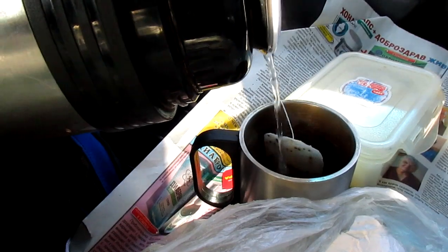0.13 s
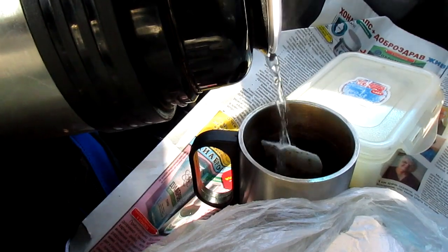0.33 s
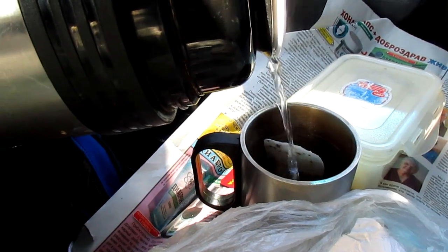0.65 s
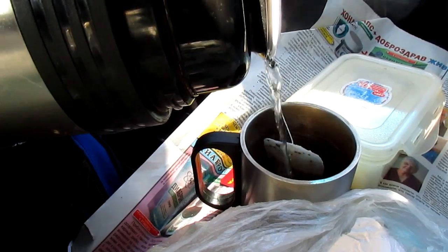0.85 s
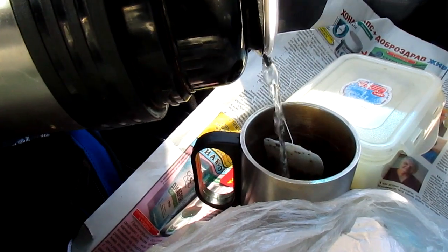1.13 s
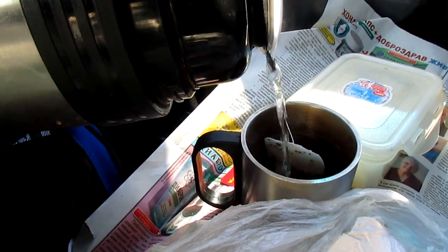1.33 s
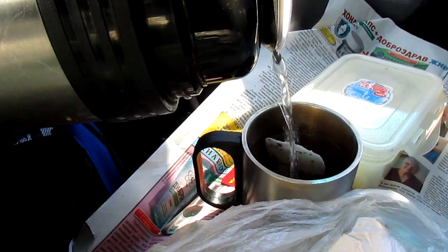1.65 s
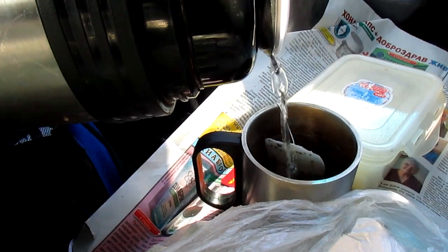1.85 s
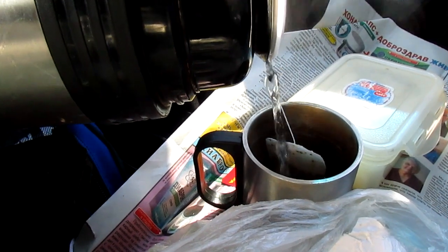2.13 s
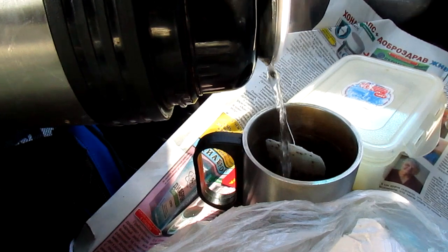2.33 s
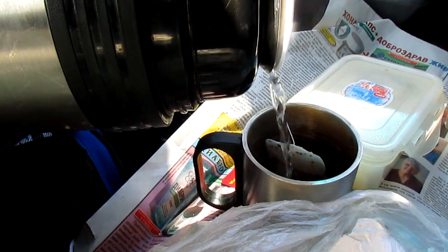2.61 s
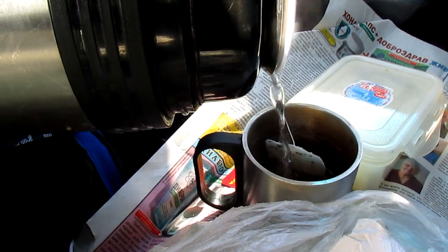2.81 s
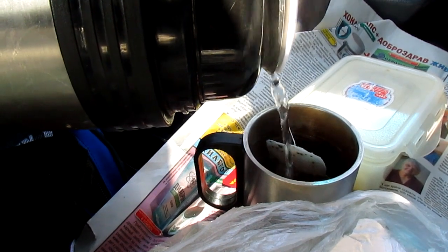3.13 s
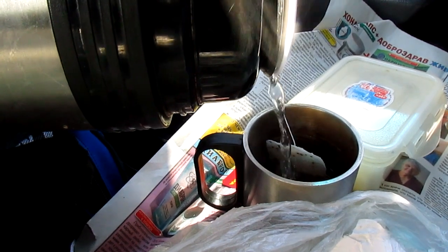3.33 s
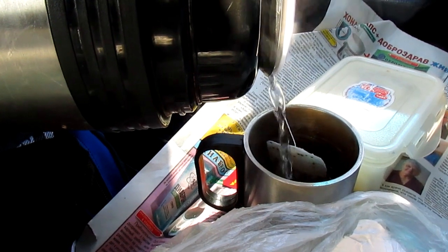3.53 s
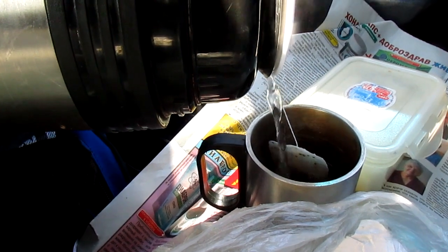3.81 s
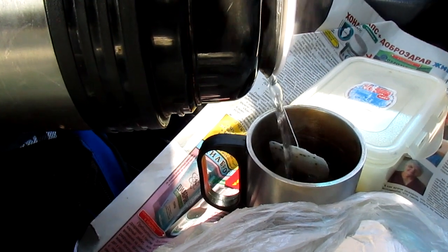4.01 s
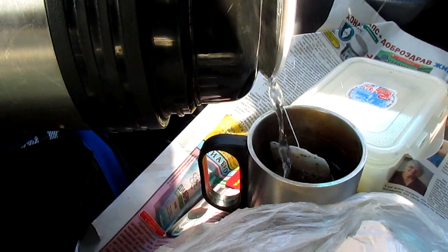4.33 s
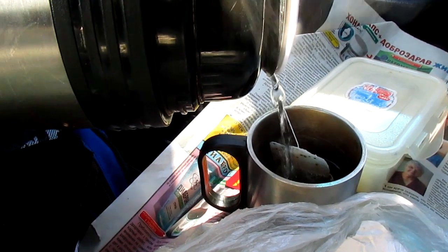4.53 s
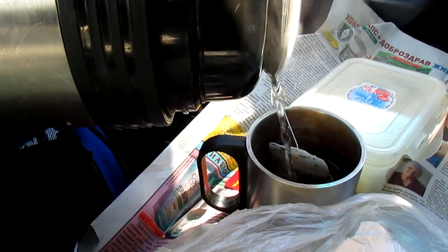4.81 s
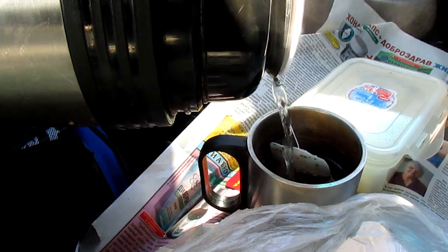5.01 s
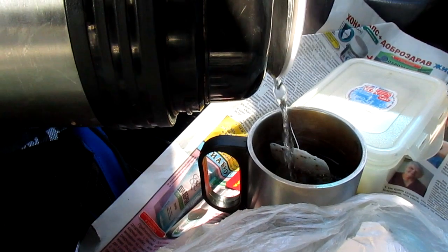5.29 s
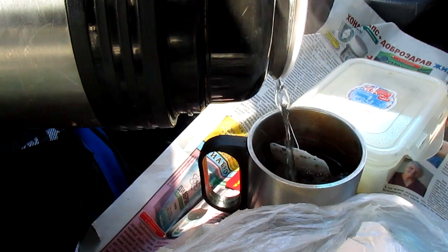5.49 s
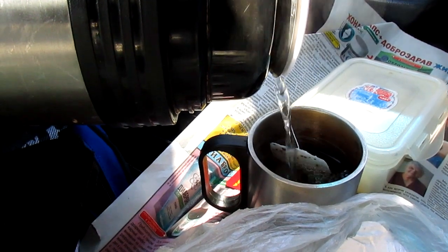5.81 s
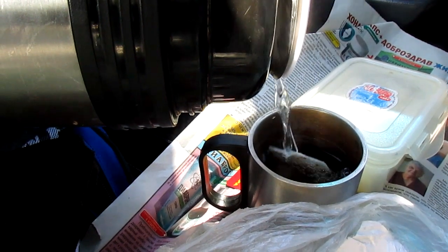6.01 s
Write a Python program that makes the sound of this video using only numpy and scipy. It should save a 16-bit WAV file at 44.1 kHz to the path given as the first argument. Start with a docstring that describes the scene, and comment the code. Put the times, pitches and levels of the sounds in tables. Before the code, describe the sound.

A thin stream of hot water trickles from a flask into a steel mug, first crisp and spattering, then increasingly bubbly and gurgling.

```python
"""Pouring water into a steel mug

A thin, beaded stream falls from a flask into a steel mug holding a tea bag, inside a parked car.
Beads make noise-burst splashes and decaying, rising bubble tones; drifting mug resonances shape both.
Spatter, fizz and burble are crowds of such grains and shaped noise; single bubbles ping as short notes.
The flask bumps softly in the hand (damped low tone plus noise); the padded cabin adds a brief echo."""
import sys
import numpy as np
from scipy import signal
from scipy.fft import rfft, irfft, next_fast_len
from scipy.io import wavfile
from scipy.ndimage import uniform_filter1d

SR = 44100
rng = np.random.default_rng(int(sys.argv[2]) if len(sys.argv) > 2 else 0)


def transcribe(u):
    """Save the signal u as a 16-bit wav file named by the first command-line argument.

    u: samples, shape (n,) or (channels, n), limited to [-1, 1]; the rate is SR.
    q: integer samples, one column per channel.
    """
    v = np.clip(np.atleast_2d(u).T, -1, 1)
    q = np.round(v * 32767).astype(np.int16)
    wavfile.write(sys.argv[1], SR, q)


N = 271215
GRAIN_SAMPLES = 2048
TOP_HZ = 16100  # band limit

# heaviest beads landing:
# (time [s], bubble level [dB], bubble pitch [Hz], splash level [dB], splash pitch [Hz]), levels before trim
HEAVY_BEADS = [(0.022, -55, 1150, -37.5, 6800), (0.0314, -58, 1110, -37.5, 8200),
               (0.094, -54, 1300, -39, 4800), (0.1476, -40, 1120, -45.5, 4740),
               (0.1762, -36.5, 1090, -44, 5860), (0.2718, -52, 1050, -43, 6370),
               (0.3236, -44.5, 1170, -43, 3820), (0.501, -49, 1165, -31.5, 6580),
               (0.605, -46, 1040, -55, 6300), (0.68, -64, 1220, -39, 5930),
               (0.7214, -51, 1185, -40.5, 6500), (0.897, -57, 1210, -38, 6550),
               (1.064, -46.5, 1120, -44, 6420), (1.288, -49, 1390, -39.5, 8200),
               (1.303, -40.5, 1860, -34, 4340), (1.527, -62, 1600, -31, 9200),
               (1.5555, -34, 1440, -38, 6600), (1.585, -51.5, 1420, -32.5, 8400),
               (1.614, -56, 1370, -35, 6600), (1.649, -32.5, 1490, -34.5, 7100),
               (1.812, -34.5, 1420, -38.5, 5250), (1.834, -36.5, 1400, -36, 4470),
               (1.853, -40.5, 1370, -41, 3980), (1.867, -29.5, 1240, -26, 5470),
               (1.9034, -34, 1420, -33.5, 8650), (1.936, -47, 1430, -32.5, 8850),
               (1.979, -41, 1240, -36.5, 5540), (2.0135, -43, 1440, -38.5, 9000),
               (2.069, -45.5, 1330, -39.5, 4850), (2.0984, -47, 1370, -33.5, 7900),
               (2.1407, -43, 810, -65, 5960), (2.191, -43, 1240, -45.5, 5070),
               (2.333, -44, 1280, -63, 7450), (2.384, -40.5, 1350, -42, 6300),
               (2.3981, -44, 1220, -38, 5400), (2.4126, -39, 1200, -34, 6900),
               (2.4634, -79, 1080, -31.5, 12700), (2.5066, -37, 1430, -37, 7400),
               (2.5474, -46, 1310, -36.5, 10900), (2.612, -45, 1380, -38.5, 6000),
               (2.6769, -35.5, 1070, -32, 7900), (2.704, -28, 820, -34.5, 7840),
               (2.7393, -33.5, 950, -43.5, 4960), (2.762, -38, 1290, -36, 7400),
               (2.7768, -33, 1190, -36.5, 7150), (2.881, -35.5, 1254, -45, 6680),
               (2.931, -41.5, 1400, -31, 3770), (2.979, -39, 1320, -63, 5500),
               (3.0177, -32.5, 1340, -46, 5630), (3.059, -34, 1310, -35.5, 5700),
               (3.181, -37, 1310, -35, 5700), (3.228, -32.5, 1440, -50, 3880),
               (3.2683, -28.5, 1380, -50, 3420), (3.3005, -36.5, 1230, -33.5, 6540),
               (3.318, -38, 1460, -33, 6380), (3.3373, -32.5, 1390, -38.5, 5100),
               (3.3608, -27.5, 1410, -39, 7280), (3.405, -36.5, 1400, -25, 9070),
               (3.4227, -33.5, 1470, -44, 9450), (3.4658, -37, 1390, -34, 8100),
               (3.49, -35, 1325, -39.5, 6050), (3.5423, -33.5, 1415, -46, 6640),
               (3.579, -38, 1660, -38, 3840), (3.608, -37, 1260, -39, 5650), (3.629, -33, 1320, -38, 6200),
               (3.642, -31, 1720, -37.5, 9900), (3.665, -36, 1395, -34.5, 4600),
               (3.6914, -29, 1260, -58, 5300), (3.8326, -27.5, 785, -42, 3660),
               (3.852, -32, 1280, -37, 6000), (3.8674, -31, 970, -41.5, 5750),
               (3.894, -39, 1200, -53, 5070), (3.961, -40, 1520, -35, 7100), (3.9667, -23, 1580, -34, 5880),
               (3.995, -46, 1670, -41.5, 5240), (4.007, -34.5, 1620, -49, 5320),
               (4.0363, -39, 1380, -47, 5540), (4.048, -30, 1396, -39.5, 5270),
               (4.0978, -34, 1060, -45, 5500), (4.103, -35.5, 1000, -40.5, 6300),
               (4.13, -34, 1200, -41, 6540), (4.1716, -29, 1110, -35.5, 6340),
               (4.183, -38, 1070, -39, 4400), (4.233, -38.5, 1280, -49, 4810),
               (4.248, -30.5, 1420, -48, 5040), (4.26, -35, 1466, -67, 4980),
               (4.2828, -28.5, 1148, -44, 4520), (4.31, -29, 1420, -33.5, 8000),
               (4.341, -28.5, 1630, -37, 4950), (4.379, -31, 1700, -39, 5370),
               (4.4226, -32, 1477, -37.5, 6660), (4.452, -34.5, 1210, -61, 5500),
               (4.4826, -34.5, 1459, -35.5, 3170), (4.504, -30.5, 1230, -50, 4170),
               (4.5224, -36, 1340, -39.5, 5620), (4.5738, -35.5, 737, -69, 5570),
               (4.592, -37, 956, -67, 6860), (4.624, -30, 800, -42.5, 7990),
               (4.6547, -31.5, 1080, -45, 4500), (4.6628, -34.5, 1400, -41, 5040),
               (4.688, -35, 1300, -54, 5070), (4.71, -34, 1470, -41.5, 4250),
               (4.8247, -32, 1300, -44.5, 7100), (4.859, -45, 1050, -37, 6520),
               (4.8758, -26, 820, -48, 5780), (4.8924, -27, 1780, -65, 4020), (4.903, -37, 1290, -31, 6500),
               (4.909, -36, 1060, -35, 6140), (4.9293, -30.5, 1200, -44, 5240),
               (4.985, -33.5, 1800, -32, 6400), (5.007, -35, 1060, -50, 6680),
               (5.0269, -33, 1550, -45, 5530), (5.076, -39, 780, -50, 4480), (5.085, -32.5, 750, -56, 5110),
               (5.112, -51, 1200, -40.5, 4850), (5.131, -39, 1170, -46, 5540),
               (5.16, -37.5, 1090, -43, 6000), (5.208, -29, 679, -47, 4660),
               (5.233, -41.5, 1020, -39, 5540), (5.255, -38, 1510, -38, 3900),
               (5.275, -31.5, 1370, -43.5, 4880), (5.3073, -34, 1830, -48, 5760),
               (5.3683, -29.5, 1360, -41, 5530), (5.3915, -33, 1020, -53, 4430),
               (5.4159, -29, 700, -42, 7820), (5.429, -39, 820, -54, 4670), (5.4421, -35, 1270, -40, 5200),
               (5.462, -36.5, 960, -42, 5830), (5.5001, -32, 1514, -58, 6800),
               (5.539, -31, 1330, -42, 3670), (5.5748, -32, 1678, -35.5, 7650),
               (5.619, -37.5, 1660, -44.5, 4730), (5.718, -37.5, 1370, -39, 5220),
               (5.729, -33.5, 800, -56, 5480), (5.755, -35.5, 886, -44, 5700), (5.765, -36, 917, -47, 5200),
               (5.781, -31, 1810, -62, 4350), (5.815, -32, 1460, -40, 7300),
               (5.848, -36.5, 1040, -38, 4750), (5.924, -37, 1500, -42, 4650),
               (5.9827, -30.5, 1440, -37.5, 7000), (5.999, -34, 1195, -52, 5680),
               (6.02, -34.5, 1380, -37.5, 7810), (6.0597, -28.5, 1240, -40.5, 6850)]
# strength of the stream as the hand tips the flask: (time [s], level [dB])
FLOW = [(0.0, -46.5), (0.2, -48.5), (0.42, -55), (0.72, -47.5), (0.92, -49), (1.1, -52.5), (1.33, -45),
        (1.42, -52.5), (1.57, -35), (1.74, -45.5), (1.92, -47), (2.15, -43.5), (2.28, -52), (2.42, -47),
        (2.76, -46), (2.84, -49.5), (2.98, -41), (3.23, -49), (3.32, -48), (3.86, -43.5), (3.92, -48.5),
        (3.98, -47.5), (4.4, -44.5), (5.13, -45.5), (5.19, -55), (5.24, -44.5), (5.6, -44.5), (6.03, -47.5),
        (6.15, -48)]
# moments of shallow, part-filled and final depth: (time [s])
FILL_TIMES_S = [1, 2.5, 4.66]
# central splash and bubble pitch at those three depths: (pitch [Hz])
SPLASH_PITCH_HZ = [7110, 8160, 7020]
BUBBLE_PITCH_HZ = [1273, 1454, 1287]


def amp(db):
    """Decibels to gain."""
    return 10 ** (np.asarray(db) / 20)


def unit(x):
    """Scale to rms 1."""
    return x / np.sqrt(np.mean(x ** 2) + 1e-20)


def along(points, hz):
    """Interpolate (Hz, value) points on a log-frequency axis."""
    f, v = np.transpose(points)
    return np.interp(np.log(hz + 1), np.log(f + 1), v)


def filtered(x, response):
    """Apply a complex frequency response to x."""
    m = next_fast_len(N + SR // 2)
    spectrum = rfft(x, m) * response(np.fft.rfftfreq(m, 1 / SR))
    return irfft(spectrum, m)[..., :N]


def causal(gain):
    """Minimum-phase response with these gains: rings only after the strike."""
    cepstrum = irfft(np.log(np.maximum(gain, 1e-6)))
    cepstrum[..., 1:GRAIN_SAMPLES // 2] *= 2
    cepstrum[..., GRAIN_SAMPLES // 2 + 1:] = 0
    return np.exp(rfft(cepstrum))


def below(hz, edge_hz, order):
    """Low-pass gain."""
    return 1 / np.sqrt(1 + (hz / edge_hz) ** (2 * order))


def above(hz, edge_hz, order):
    """High-pass gain."""
    return below(edge_hz, hz + 1, order)


def place(times, grains):
    """Sum one grain per row at its time."""
    starts = np.round(np.maximum(times, 0) * SR).astype(int)
    index = starts[:, None] + np.arange(grains.shape[-1])
    return np.bincount(index.ravel(), grains.ravel(), N)[:N]


def sized(grains, db):
    """Give each grain the energy of 10 ms at its level."""
    power = np.sum(grains ** 2, -1, keepdims=True) / (SR / 100)
    return grains * amp(db) / np.sqrt(power + 1e-20)


def bounded_normals(count):
    """Four clipped normal draws per droplet."""
    return np.clip(rng.standard_normal((count, 4)), -1.6, 1.6)


def landings(count, uneven):
    """Loosely even times through the pour, each early or late by up to `uneven` gaps."""
    turns = np.arange(count) + .5 + uneven * rng.uniform(-1, 1, count)
    return turns % count * N / SR / count


def clear_of_beads(times, gap_s=.014):
    """Mask of the moments that lie away from every heavy bead."""
    bead_times = np.array(HEAVY_BEADS)[:, 0]
    return np.abs(times[:, None] - bead_times).min(axis=1) > gap_s


def flow_db(times):
    """Strength of the stream over time."""
    return np.interp(times, *np.transpose(FLOW))


def surge_db(times):
    """Flow relative to the mean of its table points."""
    return flow_db(times) - np.mean(FLOW, axis=0)[1]


def trapped_db(times):
    """Bubble level: a slow trend through the filling plus the surge of the flow."""
    # bubbles at average flow: (time [s], level before trim [dB])
    trapping = [(0.8, -50), (2.8, -52.5), (4.4, -42.5), (6.15, -48.5)]
    return np.interp(times, *np.transpose(trapping)) + surge_db(times)


def mug(times, hz, between_db=-17):
    """Gain of the mug's hollow as it fills; neighbouring resonances cancel between their peaks."""
    # drifting resonances: (centre at time 0 [Hz], drift [Hz/s], width [Hz],
    # shallow level [dB], part-filled level [dB], final level [dB])
    resonances = [(728, -8.5, 82, 2.5, -32, 7.5), (871, -27, 114, 0, 10, 6), (1173, 2, 82, 12, 0.5, -2),
                  (1362, 16.5, 149, 10, 14.5, 6.5), (1723, 1, 117, 10.5, 0.5, 10.5),
                  (2037, 9, 43, 6, -2, -1), (2773, -3.5, 64, 11.5, 12, 3.5),
                  (2982, 11.5, 65, 9.5, -1.5, 7.5), (3150, -5, 3040, 5.5, -2.5, -9.5),
                  (4490, 380, 260, 5.5, 5.5, -40), (6240, -40, 1500, 3.5, -4.5, -7.5),
                  (8700, 22, 1650, 0, 1.5, -5), (12000, 0, 4500, 2, -17, -8.5),
                  (12550, -8, 1900, -11, -1.5, -6)]
    times, total = times[:, None], 0
    for start_hz, drift_hz_per_s, width_hz, *depth_db in resonances:
        centre_hz = start_hz + drift_hz_per_s * times
        damping = 1j * hz * width_hz
        resonance = damping / (centre_hz ** 2 - hz ** 2 + damping)
        total = total + amp(np.interp(times, FILL_TIMES_S, depth_db)) * resonance
    return np.hypot(np.abs(total), amp(between_db))


def bubbles(times, db, pitch_hz, cycles=1.47, rise=0.33, push=0.46, life_octaves=0.93, swell_s=0.00036):
    """A trapped bubble rings for a few cycles, sharpening as it surfaces; the bead's push sounds the hollow."""
    t, hz = np.arange(GRAIN_SAMPLES) / SR, np.fft.rfftfreq(GRAIN_SAMPLES, 1 / SR)
    life_s = cycles * 2 ** (life_octaves * rng.uniform(-1.6, 1, (len(times), 1))) / pitch_hz
    age = t / life_s
    sharpening = 1 + rise * (np.minimum(age, 4) - 2) / 4
    envelope = np.exp(-age) * (1 - np.exp(-t / swell_s))
    ring = np.sin(2 * np.pi * pitch_hz * t * sharpening) * envelope
    source = rfft(ring) * 2 / (life_s * SR) - 1j * push * np.minimum(hz / pitch_hz, 1)
    body = mug(times, hz) * above(hz, 481, order=6) * below(hz, 1935, order=4)
    return place(times, sized(irfft(source * causal(body)), db))


def splashes(times, db, pitch_hz, ping=0.71, ping_cycles=8, spray_db=-9, octaves=0.73, skirt_db=-19,
             apart=0.8, lead_s=.001):
    """A snap, a short spray and a tiny bubble, scattered by the steel wall towards each side."""
    t = np.arange(GRAIN_SAMPLES) / SR - lead_s
    hz = np.fft.rfftfreq(GRAIN_SAMPLES, 1 / SR)
    age_s = np.maximum(t, 0)
    tear = np.exp(np.minimum(t, 0) / .0002)  # onset before the landing
    snap, spray = np.exp(-age_s / .0014), np.exp(-age_s / .006)
    shared, *own = rng.standard_normal((3, len(times), GRAIN_SAMPLES))
    burst = (shared + apart * np.array(own)) * tear * (snap + amp(spray_db) * spray)
    tiny = ping * np.sin(2 * np.pi * pitch_hz * age_s) * np.exp(-age_s * pitch_hz / ping_cycles)
    # passband around each splash's own pitch
    octaves_off = np.abs(np.log2((hz + 1) / pitch_hz))
    colour = below(octaves_off, octaves, order=3) + amp(skirt_db)
    body = mug(times, hz) * above(hz, 1420, order=4)
    grains = sized(irfft(rfft(burst + tiny) * causal(colour * body)), db)
    return np.array([place(times - lead_s, side) for side in grains])


def notes(times, db, hz, cycles, glide):
    """A free bubble swells softly into a short note that lifts a little; glide is the rise per life."""
    age = np.arange(GRAIN_SAMPLES) / SR * hz / cycles
    phase = 2 * np.pi * np.cumsum(hz * (1 + glide * (np.minimum(age, 4) - 1)), axis=1) / SR
    envelope = (1 - np.exp(-5 * age)) * np.exp(-age)
    return place(times, sized(np.sin(phase) * envelope, db))


def hush(db=-64):
    """Still cabin air: faint steady noise, independent on each side."""
    # noise spectrum: (frequency [Hz], relative density [dB])
    air_spectrum = [(25, -5.5), (55, 3.5), (140, -2.5), (290, 0), (500, -5), (1000, -56), (4000, -56),
                    (15000, -56)]
    noise = rng.standard_normal((2, N))
    return amp(db) * unit(filtered(noise, lambda hz: amp(along(air_spectrum, hz))))


def cabin(x):
    """Upholstery swallows the echo quickly: decaying noise, convolved with the source."""
    # decay: (frequency [Hz], time to fall 60 dB [s])
    decay_s = [(300, 0.017), (1200, 0.14), (3000, 0.14), (8000, 0.061), (15000, 0.0038)]
    hz, t, z = signal.stft(rng.standard_normal((2, SR // 3)), SR, nperseg=256)
    decay = amp(-60 * t / along(decay_s, hz)[:, None])
    tail = signal.istft(z * decay, SR, nperseg=256)[1]
    tail = np.pad(tail / np.linalg.norm(tail[0]), ((0, 0), (SR // 250, 0)))  # 4 ms pre-delay
    return signal.fftconvolve(x, tail, axes=1)[:, :N]


def handling(lowest_bump_hz=108, bump_db=2, scuff_s=0.022, rub_size=5.7):
    """Hand on flask: dull bumps of damped tone and noise, and brief scuffs of low noise."""
    # soft bumps: (time [s], level before trim and filter [dB])
    bump_table = [(2.58, -48), (2.722, -50), (2.863, -49), (2.977, -46.5), (3.257, -54), (3.4, -52),
                  (3.52, -54.5), (3.662, -53), (3.781, -49), (4.343, -51.5), (4.852, -54.5), (5.258, -52)]
    # grip shifts: (time [s], peak of the rms envelope [dB])
    scuff_table = [(.112, -50.5), (0.215, -46), (2.52, -57)]
    t = np.arange(SR // 6) / SR
    s, db = np.transpose(bump_table)
    knock_hz = lowest_bump_hz * rng.uniform(1.0, 1.12, (len(s), 1))
    knock = np.sin(2 * np.pi * t * knock_hz) * np.exp(-t / 0.011)
    rub = rub_size * rng.standard_normal((2, len(s), len(t))) * np.exp(-t / 0.016)
    bumps = np.array([place(s, amp(db + bump_db)[:, None] * (knock + side)) for side in rub])
    bumps = filtered(bumps, lambda hz: above(hz, 28, order=2) * below(hz, 370, order=2))
    clock = np.arange(N) / SR
    grip = sum(amp(level) * np.exp(-((clock - at) / scuff_s) ** 2) for at, level in scuff_table)
    noise = rng.standard_normal((2, N))
    scuffs = unit(filtered(noise, lambda hz: above(hz, 95, order=2) * below(hz, 710, order=3)))
    return bumps + grip * scuffs


def wash(murmur_db=-60, fizz_db=-12.0, grain_db=3, apart=1.5):
    """The unbroken stream seethes on the tea bag: grainy noise keeps the mug faintly ringing."""
    shared, *own = rng.standard_normal((3, N))
    flutter = unit(uniform_filter1d(rng.standard_normal(N), size=120))
    seethe = (shared + apart * np.array(own)) * amp(grain_db * flutter)
    hz, times, z = signal.stft(seethe, SR, nperseg=1024)
    rung = signal.istft(z * mug(times, hz).T, SR, nperseg=1024)[1][:, :N]
    murmur = unit(filtered(rung, lambda hz: above(hz, 170, order=3) * below(hz, 1090, order=4)))
    fizz = unit(filtered(rung, lambda hz: above(hz, 2650, order=3) * below(hz, 18000, order=2)))
    return amp(murmur_db) * murmur + amp(flow_db(np.arange(N) / SR) + fizz_db) * fizz


def prickle(count=1500, db=-14.5, scatter_db=6, low_hz=2900, high_hz=15500, cycles=5, apart=0.43):
    """Dense fizz of tiny bubbles bursting around the stream, each with its own pitch and side."""
    times = landings(count, uneven=10)
    pitch, size, side = rng.uniform(-1.006, 1, (count, 3)).T[:, :, None]
    hz = low_hz * (high_hz / low_hz) ** ((pitch + 1) / 2)
    level = flow_db(times)[:, None] + db + scatter_db * size
    pan_db = 10 * apart * side
    return np.array([notes(times, level + way * pan_db, hz, cycles, glide=0.026) for way in (1, -1)])


def blips(count=70, scatter_db=3, octaves=0.46, cycles=2.2, glide=0.011):
    """Once the water is deep, faint free bubbles ring all over the surface."""
    # trend of the free bubbles: (time [s], central level [dB], central pitch [Hz])
    blip_trend = [(4.301, -65, 2360), (5.4, -49.5, 2470), (5.851, -55, 2467), (6.042, -58, 2190)]
    s, db, pitch_hz = np.transpose(blip_trend)
    late, size, detune, eager = rng.uniform(-1, 1, (count, 4)).T[:, :, None]
    times = s[0] + (np.arange(count) + late[:, 0]) * (s[-1] - s[0]) / count
    hz = np.interp(times, s, pitch_hz)[:, None] * 2 ** (octaves * detune)
    level = np.interp(times, s, db)[:, None] + scatter_db * size
    return notes(times, level, hz, cycles, glide * (1 + eager))


def burble(count=420, low_hz=740, high_hz=2100, scatter_db=8.5, cycles=4, push=0.32):
    """Overlapping bubbles churned under the surface keep the hollow of the mug ringing."""
    # burble at average flow: (time [s], central level [dB])
    burble_trend = [(0.0, -77), (1.4, -55), (3.0, -66), (3.6, -50), (4.4, -47.5), (5.2, -48.5),
                    (5.75, -41.5), (6.15, -53)]
    times = landings(count, uneven=0.99)
    free = clear_of_beads(times)
    times = times[free]
    pitch, size = rng.uniform(-0.93, 1, (count, 2))[free].T[:, :, None]
    hz = low_hz * (high_hz / low_hz) ** ((pitch + 1) / 2)
    central_db = np.interp(times, *np.transpose(burble_trend)) + surge_db(times)
    db = central_db[:, None] + scatter_db * size
    return bubbles(times, db, hz, cycles=cycles, rise=0.34, push=push, life_octaves=1.1)


def pings(ring_s=0.0014, glide=0.017, note_db=3.0, splash_db=-5):
    """The clearest bubbles: each a short note born in a small splash."""
    # single bubbles: (time [s], level before trim [dB], pitch [Hz])
    ping_table = [(0.1658, -40.5, 3730), (0.2712, -35.5, 6060), (0.3237, -45, 3300), (0.4082, -50.5, 3820),
                  (0.597, -39.5, 6400), (0.7333, -44, 4850), (0.865, -46.5, 4950), (0.8971, -44, 4950),
                  (1.018, -50, 4820), (1.0319, -45, 4850), (1.286, -41, 9200), (1.753, -41, 6600),
                  (1.9168, -37, 8700), (2.132, -44, 5960), (2.9331, -37, 2890), (5.5383, -39, 2600),
                  (5.5564, -38, 1420), (5.6296, -41.5, 2150), (5.6755, -47, 3230), (5.6981, -41.5, 4810),
                  (5.804, -43, 2610), (5.8492, -37, 3070), (5.873, -51, 3480), (5.942, -37.5, 2120),
                  (5.9644, -40.5, 4030)]
    s, db, hz = np.transpose(ping_table)[:, :, None]
    ringing = notes(s[:, 0], db + note_db, hz, ring_s * hz, glide)
    return ringing + splashes(s[:, 0], db + splash_db, hz, spray_db=15, octaves=0.35)


def spatter(count=440, bubble_db=-7.5, splash_db=-1.5, scatter_db=6.0, bubble_octaves=0.48,
            splash_octaves=0.656):
    """Small droplets land at random, their level loosely following the flow and their pitch the depth."""
    times = landings(count, uneven=2)
    size, own, low, high = bounded_normals(count).T[:, :, None]
    level = trapped_db(times)[:, None] + bubble_db + scatter_db * size
    pitch_hz = np.interp(times, FILL_TIMES_S, BUBBLE_PITCH_HZ)[:, None] * 2 ** (bubble_octaves * low)
    plops = bubbles(times, level, pitch_hz, cycles=3.4, push=0.72, life_octaves=1.2)
    level = flow_db(times)[:, None] + splash_db + scatter_db * (size + own) / np.sqrt(2)
    pitch_hz = np.interp(times, FILL_TIMES_S, SPLASH_PITCH_HZ)[:, None] * 2 ** (splash_octaves * high)
    pitch_hz = np.minimum(pitch_hz, TOP_HZ)
    return plops + splashes(times, level, pitch_hz, ping=6.1, spray_db=18.0, octaves=0.63)


def trickle(count=190, bubble_db=-9, splash_db=0, bubble_scatter_db=4, splash_scatter_db=0.5,
            bubble_octaves=0.64, splash_octaves=0.42):
    """Between heavy beads the stream pinches off ordinary ones, each with its own size and pitch."""
    times = landings(count, uneven=.5)
    free = clear_of_beads(times)
    times = times[free]
    size, own, low, high = bounded_normals(count)[free].T
    low_db = trapped_db(times) + bubble_db + bubble_scatter_db * size
    high_db = flow_db(times) + splash_db + splash_scatter_db * (size + own) / np.sqrt(2)
    low_hz = np.interp(times, FILL_TIMES_S, BUBBLE_PITCH_HZ) * 2 ** (bubble_octaves * low)
    high_hz = np.interp(times, FILL_TIMES_S, SPLASH_PITCH_HZ) * 2 ** (splash_octaves * high)
    high_hz = np.minimum(high_hz, TOP_HZ)
    plops = bubbles(times, low_db[:, None], low_hz[:, None], cycles=2.5, push=0.09, life_octaves=0.86)
    slaps = splashes(times, high_db[:, None], high_hz[:, None], ping=1.0, spray_db=6.0, skirt_db=-24.5)
    return plops + slaps


def beads(bubble_db=-0.26, splash_db=1, trail_s=.005, trail_db=-13):
    """Heaviest beads: a splash and a bubble; the closing crater traps a second, weaker bubble."""
    s, low_db, low_hz, high_db, high_hz = np.transpose(HEAVY_BEADS)[:, :, None]
    late, detune = rng.uniform(-0.51, 0.538, (len(s), 2)).T[:, :, None]
    trail_times = (s + trail_s * (1 + late))[:, 0]
    trailing = bubbles(trail_times, low_db + trail_db, low_hz * 2 ** detune, cycles=1.77, push=0.2)
    first = bubbles(s[:, 0], low_db + bubble_db, low_hz)
    return first + trailing + splashes(s[:, 0], high_db + splash_db, high_hz)


def scene(lag_s=.000028, cabin_db=-16):
    """Mix; the mug stands a little to the right of the microphones."""
    # level difference between the sides: (frequency [Hz], left minus right [dB])
    lean_db = [(700, 0), (1290, -3), (2400, -5.5), (4400, -2), (8100, 2.5), (15000, 0.5)]
    sides = np.array([[.5], [-.5]])
    water = beads() + trickle() + spatter() + burble() + prickle() + pings() + blips() + wash()

    def placement(hz):
        """Level and arrival time at each side."""
        return amp(sides * along(lean_db, hz)) * np.exp(-2j * np.pi * hz * lag_s * sides)

    water = filtered(water, placement)
    return water + amp(cabin_db) * cabin(water) + handling() + hush()


def record(dry):
    """The ports swallow one narrow band, and nothing is kept above the band limit."""
    # notch: (centre [Hz], half-width to 1/e [Hz], depth as a share of the gain [0-1])
    port_notch = (7880, 120, 0.55)
    dip_hz, width_hz, depth = port_notch

    def response(hz):
        """Notch and band limit."""
        notch = 1 - min(depth, 1) * np.exp(-((hz - dip_hz) / width_hz) ** 2)
        return notch * (hz < TOP_HZ)

    return filtered(dry, response)


dry = scene()
out = record(dry)
transcribe(out)
```